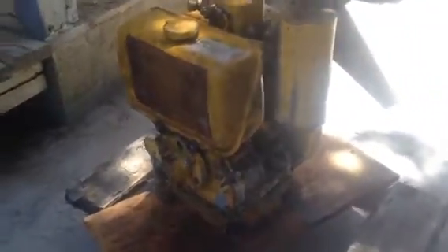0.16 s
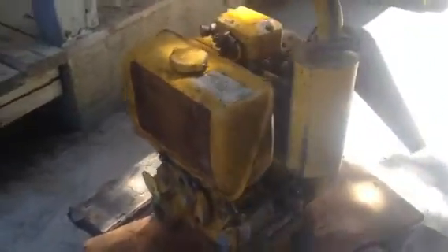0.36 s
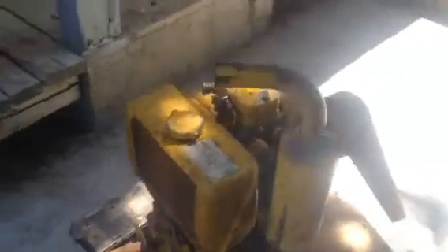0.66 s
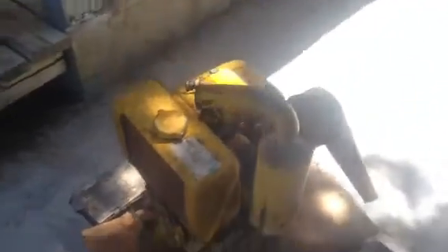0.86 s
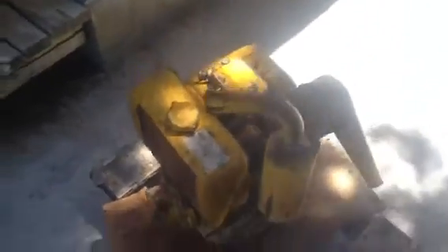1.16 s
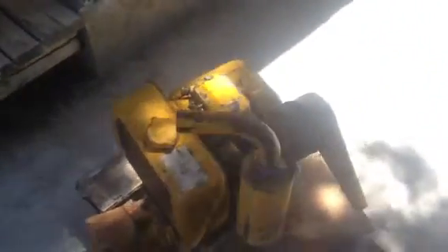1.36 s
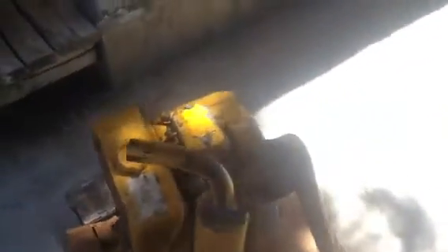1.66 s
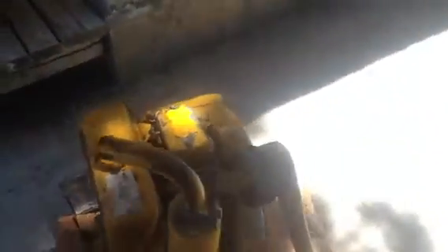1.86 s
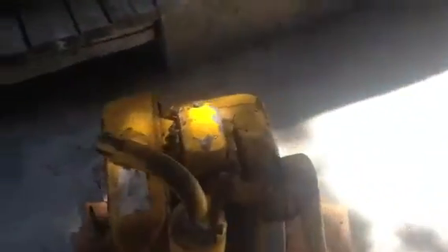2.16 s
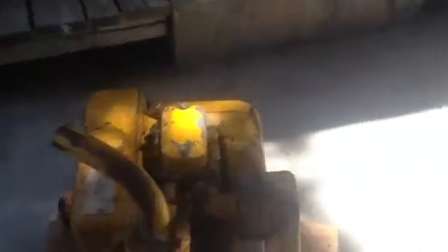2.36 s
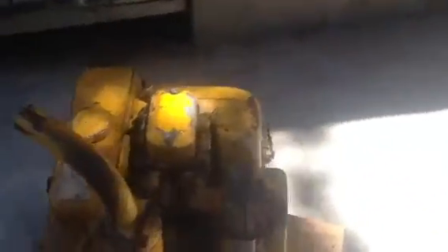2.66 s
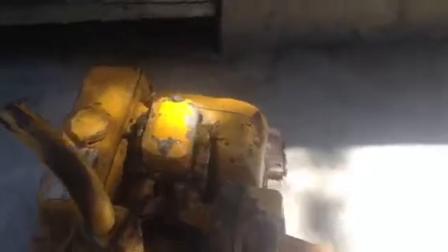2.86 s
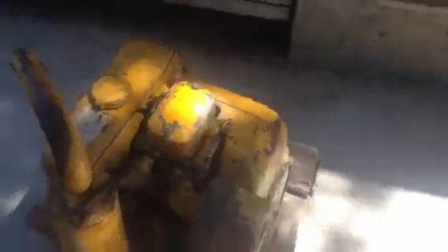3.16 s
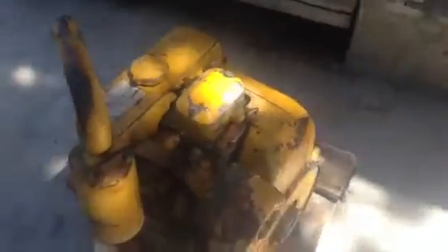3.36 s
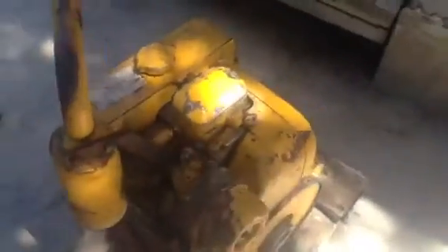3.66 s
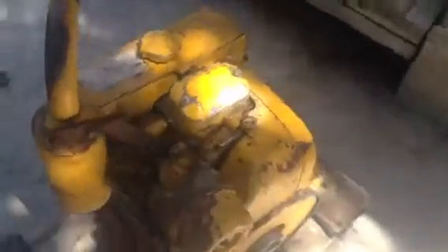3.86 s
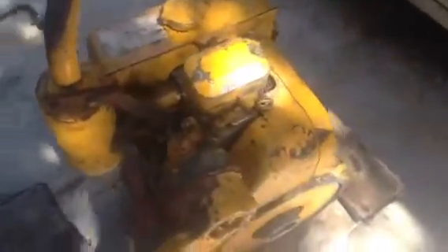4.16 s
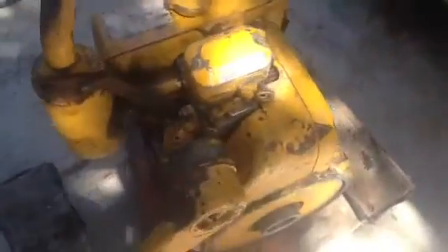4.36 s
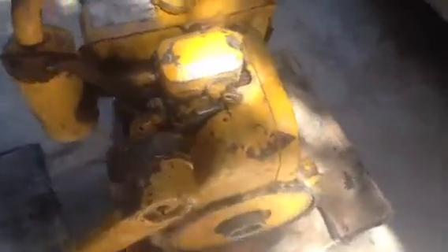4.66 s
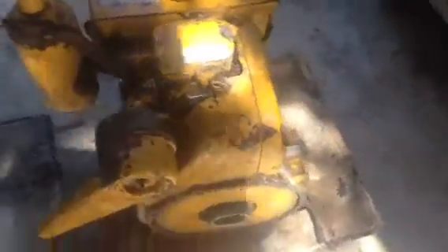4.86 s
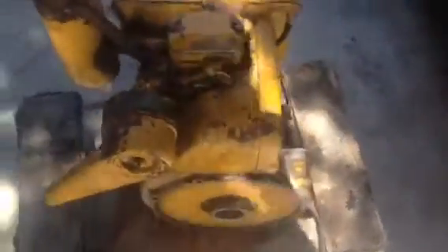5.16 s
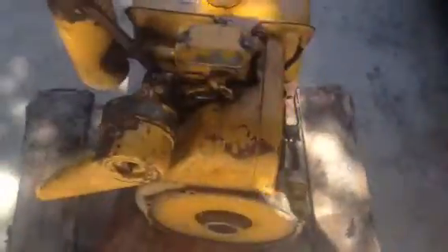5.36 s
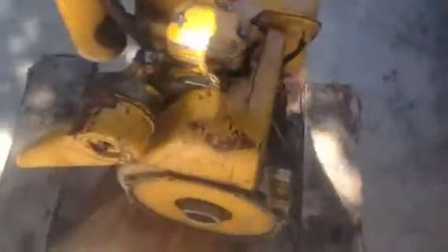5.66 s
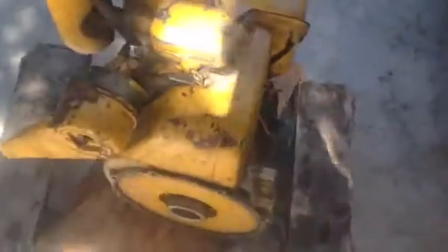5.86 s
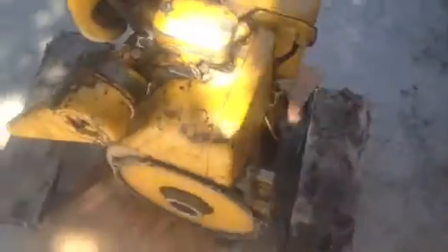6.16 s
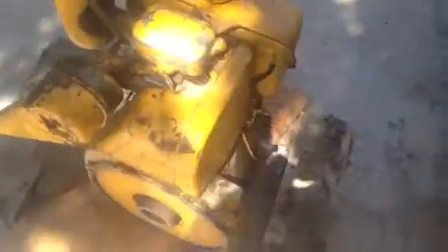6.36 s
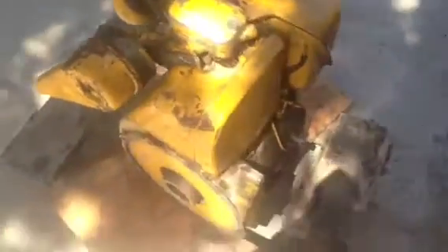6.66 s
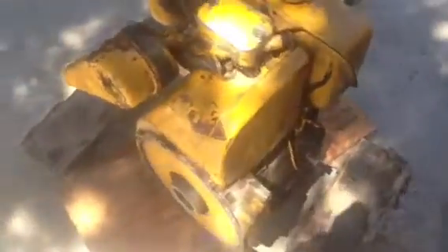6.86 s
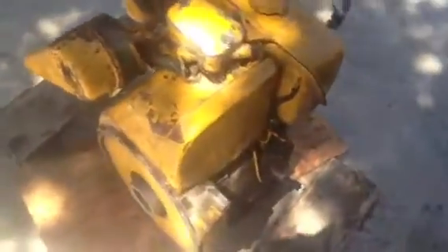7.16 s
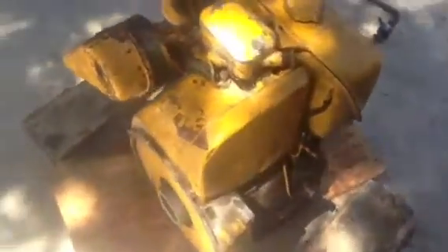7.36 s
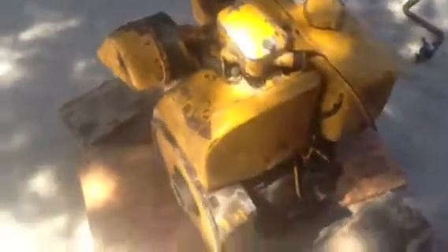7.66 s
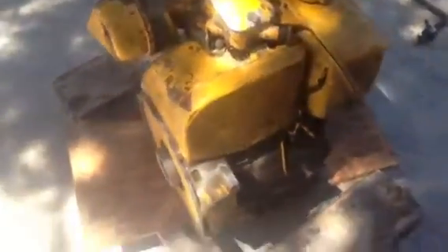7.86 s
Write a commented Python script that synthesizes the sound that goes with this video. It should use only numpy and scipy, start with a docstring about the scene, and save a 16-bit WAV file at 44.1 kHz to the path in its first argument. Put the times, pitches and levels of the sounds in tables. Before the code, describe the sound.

Steady clattering idle of a small diesel engine outdoors, dulled for a few seconds as a finger covers the microphone.

```python
"""In a yard, a small one-cylinder four-stroke diesel idles on boards, heard by a phone walking round it.
Each firing knocks the engine block and makes it ring. Fuel pump, piston, valves and exhaust add
thuds, clatter and puffs at set places in the cycle, over a whirring fan and a light breeze.
A finger slides over the microphone hole for some seconds, dulling the treble and creaking on the case.
Near the end the phone drops a tiny piece of the sound."""
import sys
import numpy as np
from scipy import signal
from scipy.fft import rfft, irfft
from scipy.io import wavfile
from scipy.ndimage import uniform_filter1d

SR = 44100
rng = np.random.default_rng(int(sys.argv[2]) if len(sys.argv) > 2 else 0)


def wrap_up_sound(samples):
    """Save the sound to the file named by the first command line argument, as 16-bit audio."""
    columns = np.atleast_2d(samples).T
    # keep every value between -1 and 1, then stretch to whole-number steps
    tamed = np.clip(columns, -1, 1)
    steps = np.round(tamed * 32767).astype(np.int16)
    wavfile.write(sys.argv[1], SR, steps)


N = 353241
SKIP_S, SKIP = 7.3795, 1024  # when the phone drops sound, and how many samples
FIRINGS, LEAD, CYCLE = 92, 700, 6144  # one row of sound a firing: samples before it, and in all
CYCLE_MS = (np.arange(CYCLE) - LEAD) * 1000 / SR  # time since the firing, like every t/ms below


def amp(db):
    return 10 ** (np.asarray(db) / 20)


def unit_rms(x):
    return x / np.sqrt(np.mean(x ** 2) + 1e-20)


def at_pitch(points, hz):
    f, value = np.transpose(points)
    return np.interp(np.log(hz + 1), np.log(f + 1), value)


def coloured(x, spectrum, tilt_db=0):
    """Filters x to a spectrum, tilted by tilt_db an octave around 4 kHz."""
    hz = np.abs(np.fft.fftfreq(4096, 1 / SR))
    log_gain = np.log(amp(at_pitch(spectrum, hz) + tilt_db * np.log2((hz + 100) / 4000)))
    phase = -signal.hilbert(log_gain).imag  # nothing rings before it is struck
    taps = np.fft.ifft(np.exp(log_gain + 1j * phase)).real[:2048]
    return signal.oaconvolve(x, taps)[:len(x)]


# The governor lets the idle drift a little: t/s, crank speed/rpm
IDLE_SPEED = [(0, 1346.04), (2.7, 1345.5), (5.4, 1351.24), (8.1, 1347.79)]
def firing_times(first_s=.0511):
    """The engine fires once in two turns, and is already running at the start."""
    clock = np.arange(-.1, N / SR + .2, 1 / SR)
    cycles = np.cumsum(np.interp(clock, *np.transpose(IDLE_SPEED))) / 120 / SR
    return np.interp(np.interp(first_s, clock, cycles) + np.arange(-1, FIRINGS - 1), cycles, clock)


FIRED_S = firing_times()
def at_firings(rows):
    """Places one row of sound at each firing."""
    track = np.zeros(N + SKIP + 3 * CYCLE)
    for start, row in zip(np.round(FIRED_S * SR).astype(int) - LEAD + CYCLE, rows):
        track[start:start + CYCLE] += row
    return track[CYCLE:CYCLE + N + SKIP]


# The walk round the engine: t/s, tank side in view/0-1, thuds/dB, puffs/dB, low rings/dB, silencer/dB
WALK_ROUND = [(0, 0.74, -26, -32, -33, -46), (.3, 0.57, -25, -26, -33.5, -38),
              (.55, 0.37, -21, -23, -26, -16.5), (1.2, 0.84, -20, -25, -25, -10),
              (1.9, 0.2, -17.5, -21.5, -29, -23), (2.5, 0.8, -19, -23.5, -22, -17),
              (2.85, 0.06, -23, -24, -27.5, -41), (3.3, 0, -18.5, -24.5, -26, -26),
              (3.9, 0.1, -22, -23, -28, -32), (4.701, 0.44, -20, -23.5, -27, -44),
              (5.5, .4, -23, -24, -25, -44), (6.5, 0.17, -21.5, -24, -31, -35),
              (7.001, 0, -19.5, -24.5, -40, -30), (7.4, 0.16, -23, -27.5, -51, -17),
              (8.01, 0, -21, -27, -35, -24)]
TANK, THUD, PUFF, LOW_RINGS, SILENCER = 1, 2, 3, 4, 5
def along_walk(column, table=WALK_ROUND, s=None):
    """Glides through one column of a timed table, allowing for the dropped samples."""
    columns = np.transpose(table)
    engine_s = columns[0] + (columns[0] > SKIP_S) * SKIP / SR
    return np.interp(np.arange(N + SKIP) / SR if s is None else s, engine_s, columns[column])


# How alike the noise is from one cycle to the next: f/Hz, likeness/0-1
LIKENESS = [(500, .9), (1500, .85), (3000, .55), (8000, .3)]
def rattle():
    """Noise for each cycle that partly repeats the one before, most in the bass."""
    same = at_pitch(LIKENESS, np.fft.rfftfreq(CYCLE, 1 / SR))
    spectra = rfft(rng.standard_normal((FIRINGS, CYCLE)))
    for k in range(1, FIRINGS):
        spectra[k] = same * spectra[k - 1] + np.sqrt(1 - same ** 2) * spectra[k]
    return irfft(spectra, CYCLE)


# Tone of the fan and gears: f/Hz, level/dB
FAN_TONE = [(60, -55), (200, -18.5), (330, -3), (500, -7), (1000, 0.5), (1650, -9.5), (2100, -19.5),
            (4200, -10.5), (5200, -17.5), (8000, -27), (9800, -29.5), (15000, -47)]
def fan_and_gears(db=-26.5):
    """The cooling fan and gears churn much alike each cycle, swelling after the firing."""
    crossfade = np.sqrt(np.clip(np.minimum(CYCLE_MS + 15, 89 - CYCLE_MS) / 15, 0, 1))
    swell = 0.39 + 1.29 * np.exp(-np.maximum(CYCLE_MS, 0) / 40) * (CYCLE_MS > 0)
    return amp(db) * unit_rms(coloured(at_firings(crossfade * swell * rattle()), FAN_TONE))


# Tone of the breeze: f/Hz, level/dB
BREEZE_TONE = [(30, -18), (60, -8), (90, -2), (200, -2), (500, -9.5), (2000, -42)]
def breeze(db=-41):
    """Air rumbles over the microphone."""
    return amp(db) * unit_rms(coloured(rng.standard_normal(N + SKIP), BREEZE_TONE))


# The finger shifts and lets one firing through: t/s, share uncovered/0-1, extra knock/dB
FINGER_LIFTS = [(3.175, 0.12, 7.5), (3.532, 0.24, 4), (6.73, 0.11, 9)]
def finger_lifts(column, s, width_s=0.043):
    """Each lift comes and goes in a short, smooth bump."""
    return sum(row[column] * np.exp(-.5 * ((s - row[0]) / width_s) ** 2) for row in FINGER_LIFTS)


# The knock as the phone moves nearer and further: t/s, level/dB
KNOCK_LEVEL = [(0, -9.5), (.68, -14.5), (1.4, -14), (1.9, -12.5), (2.5, -14.5), (3.0, -18), (3.35, -13),
               (3.9, -13.5), (5.04, -14), (5.8, -16.5), (6.5, -14.5), (6.9, -12), (7.7, -12), (8.01, -8)]
def knock_strength(scatter_db=1.0):
    """How loud each firing is; the fuel never burns twice alike."""
    db = along_walk(1, KNOCK_LEVEL, FIRED_S) + finger_lifts(2, FIRED_S)
    return amp(db[:, None] + scatter_db * rng.standard_normal((FIRINGS, 1)))


# Injector, flame crack, combustion knock, casing rattle, exhaust tappet, exhaust valve shutting,
# inlet valve shutting: rise/ms, fall/ms, level/dB, tilt/dB per octave
METAL_BLOWS = [(1.2, 4.5, -18, -4.5), (1.2, 3.35, -6, 4), (3.36, 3.7, 6.5, -0.5), (3.2, 19.4, -7.5, -2.5),
               (2.1, 3.8, -20, -5.5), (0.87, 9, -19.5, -6), (1.4, 2.4, -18.5, 1)]
BLOW_TIMES = [-9, -1, -.3, 2, 23, 46.5, 71]  # when each lands: t/ms
CLATTER_TONE = [(150, -35.5), (400, -9), (1000, -2.5), (2050, -4.5), (3040, 1.5), (4400, -2), (5300, -4.5),
                (7300, -2), (8300, -6), (9800, -20), (14600, -22), (16000, -35)]  # tone they share: f/Hz, level/dB
def metal_blows(knock):
    """Each blow is a burst of rattle. Returns the raw bursts and the clatter they make."""
    noise, bursts, clatter = rattle(), 0, 0
    for ms, (rise, fall, db, tilt_db) in zip(BLOW_TIMES, METAL_BLOWS):
        louder, later = rng.standard_normal((FIRINGS, 2, 1)).transpose(1, 0, 2)
        t = np.maximum(CYCLE_MS - ms - .3 * later, 0)
        scatter_db = 4.1 * louder * (abs(ms) > 5)  # the small blows, away from the firing, vary more
        envelope = (1 - np.exp(-(t / rise) ** 2)) * np.exp(-t / fall)
        burst = at_firings(knock * amp(db + scatter_db) * envelope * noise)
        bursts += burst
        clatter += coloured(burst, CLATTER_TONE, tilt_db)
    return bursts, clatter


def short_ring(ms, hz, rise, fall, db):
    """A tone that swells to a peak at ms and dies away, a little different each cycle."""
    louder, later = rng.standard_normal((FIRINGS, 2, 1)).transpose(1, 0, 2)
    t = CYCLE_MS - ms - .08 * later
    envelope = np.where(t < 0, np.exp(-.5 * (t / rise) ** 2), 1 / np.cosh(np.minimum(t / fall, 50)))
    return amp(db + 1.2 * louder) * envelope * np.cos(2 * np.pi * hz * t / 1000)


# Fuel pump, firing loads the crank, frame rebounds, silencer shakes, piston tips over,
# inlet valve shuts: f/Hz, rise/ms, fall/ms, relative level/dB
FRAME_THUDS = [(390, 2.6, 1.7, -5), (325, 2.6, 2.8, 2), (340, 2.5, 2.5, -12), (300, 3, 3, -12),
               (350, 2.6, 2.4, -4), (320, 2.6, 2, -10)]
THUD_TIMES = [-3.1, 9, 20, 30, 42.9, 75]  # when each peaks: t/ms
def frame_thuds():
    """Moving parts shake the frame with low thuds."""
    thuds = sum(short_ring(ms, *row) for ms, row in zip(THUD_TIMES, FRAME_THUDS))
    return at_firings(amp(along_walk(THUD, s=FIRED_S)[:, None] + 5) * thuds)


# Sharp jolts to the block: t/ms, level/dB
JOLTS = [(1.5, -0.5), (7.5, 2.5), (50, -14.5)]
# Natural notes of block, tank and cowl: f/Hz, width/Hz (wider dies sooner), level/dB
METAL_NOTES = [(665.3, 18, -1.5), (827.5, 26, -1.5), (1016.3, 51, 2), (1292, 14, 0.5), (1647, 25, 7.5),
               (1882, 23, 10.5), (2403, 36, 9.5), (2480, 20, -1.5), (2900, 29, -21.5), (3050, 59, 12),
               (3440, 37, -31.5), (3690, 43, -1), (4240, 43, 4), (4500, 42, -18), (5500, 51, 2),
               (6100, 67, 6.5), (6910, 57, -27.5)]
def ringing_block(knock, bursts, high_db=-33.5):
    """Jolts and rattle set the metal ringing; the low notes come and go along the walk."""
    jolts = sum(amp(db + 1.5 * rng.standard_normal((FIRINGS, 1)))
                * np.exp(-.5 * ((CYCLE_MS - ms) / .04) ** 2) for ms, db in JOLTS)
    shaking = unit_rms(at_firings(knock * jolts)) + amp(7) * unit_rms(bursts)
    t, rings = np.arange(6000) / SR, np.zeros((2, 6000))
    for hz, width, db in METAL_NOTES:
        decay = np.exp(-np.pi * max(width, hz / 60) * t)  # high notes never ring long
        rings[int(hz > 1450)] += amp(db) * np.sqrt(width) * decay * np.sin(2 * np.pi * hz * t)
    low, high = (unit_rms(signal.oaconvolve(shaking, ring)[:len(shaking)]) for ring in rings)
    return amp(along_walk(LOW_RINGS)) * low + amp(high_db) * high


# Three clanks of the cylinder and one of a valve: f/Hz, rise/ms, fall/ms, relative level/dB
IRON_CLANKS = [(1673, 1.84, 1.84, -5.5), (2620, 0.53, 1.4, -5.5), (3420, 0.88, 1, -9.5),
               (4290, 1.5, 1.9, -17)]
CLANK_TIMES = [7, 4.5, 4, 49]  # when each peaks: t/ms
def iron_clanks(knock, db=-4, tank_side_db=9):
    """Iron rings briefly, never twice alike, and loudest on the tank side."""
    scatter = rng.standard_normal((FIRINGS, len(IRON_CLANKS), 2, 1)).transpose(1, 2, 0, 3)
    iron = 0
    for ms, (hz, *shape), (louder, higher) in zip(CLANK_TIMES, IRON_CLANKS, scatter):
        iron += amp(3 * louder) * short_ring(ms, hz * (1 + .025 * higher), *shape)
    return amp(db + tank_side_db * along_walk(TANK)) * at_firings(knock * iron)


def silencer():
    """The silencer can gives a hollow ring just after each firing."""
    return amp(along_walk(SILENCER)) * at_firings(short_ring(ms=8.5, hz=975, rise=3.5, fall=4.5, db=0))


# Exhaust valve opens, air heaves, pipe answers, intake gulps: f/Hz, rise/ms, fall/ms, relative level/dB
PIPE_PUFFS = [(185, 3, 5, 0), (80, 8, 10, -13), (200, 5, 5, -8), (195, 4, 5, -9)]
PUFF_TIMES = [26.5, 34, 46.5, 72]  # when each peaks: t/ms
def pipe_puffs():
    """Gas leaves and enters the pipes in deep puffs."""
    puffs = sum(short_ring(ms, *row) for ms, row in zip(PUFF_TIMES, PIPE_PUFFS))
    return amp(along_walk(PUFF)) * at_firings(puffs)


# Change of tone with the hole covered, on the tank side and on the flywheel side: f/Hz, gain/dB
COVERED_TONE = [(100, 3), (320, 9), (800, 2), (1400, -9.5), (1850, -4.5), (2300, -15), (3300, -30.5),
                (4300, -32.5), (4900, -40), (8000, -36), (14000, -26)]
TANK_TONE = [(200, -1), (480, -1.5), (950, -7), (1300, -1), (1700, 2.5), (2700, 5.5), (4200, 2), (9000, -3)]
FLYWHEEL_TONE = [(300, -8), (950, -16), (1700, -3), (2800, 0.5), (4200, 13), (7000, 16.5), (9500, 1),
                 (15000, -0.5)]
FINGER_COVER = [(0, 0.25), (.45, 0.11), (1.1, 0.11), (1.85, 0.07), (2.5, 0.1), (2.64, 0.44), (2.82, 0.71),
                (3.08, 0.57), (3.3, 0.46), (3.62, 0.64), (4.3, 0.74), (5.04, 0.68), (5.8, 0.66),
                (6.64, 0.65), (6.73, 0.58), (6.82, 0.08), (7.26, 0.15), (8.01, 0.32)]  # the finger creeps on, stays, slides off: t/s, hole covered/0-1
FLYWHEEL_VIEW = [(0, 0.39), (6.3, 0.28), (6.999, 0.5), (8.01, 0.8)]  # flywheel side in view: t/s, share/0-1
def finger_and_sides(x, top_treble_db=2):
    """The finger muffles the microphone, and each side of the engine has its own tone."""
    hz, t, spectra = signal.stft(x, SR, nperseg=512, noverlap=384)
    tones = [(COVERED_TONE, along_walk(1, FINGER_COVER, t) - finger_lifts(1, t)),
             (TANK_TONE, along_walk(TANK, s=t)),
             (FLYWHEEL_TONE, along_walk(1, FLYWHEEL_VIEW, t))]
    gain_db = sum(at_pitch(tone, hz)[:, None] * share for tone, share in tones)
    gain_db += np.clip((hz[:, None] - 8500) / 2000, 0, 1) * top_treble_db
    return signal.istft(spectra * amp(gain_db), SR, nperseg=512, noverlap=384)[1][:len(x)]


# Finger creaks: t/s, length/s, first slip rate/Hz, last slip rate/Hz, level/dB, roughness/0-1
SKIN_CREAKS = [(0.301, 0.075, 130, 91, -33, 0.65), (1.72, 0.078, 170, 290, -33, 0.44),
               (1.926, 0.068, 120, 150, -26, 0.05), (2.025, 0.091, 200, 76, -25.5, 0.57),
               (2.72, 0.034, 170, 130, -35, 0.5), (3.07, 0.037, 155, 190, -29, 0.7),
               (3.37, 0.15, 160, 240, -24.5, 0.51), (3.983, 0.039, 220, 290, -48, 0.56),
               (4.299, 0.042, 170, 220, -33, 0.45), (4.36, .04, 150, 170, -28.5, 0.4),
               (5.23, 0.1, 140, 160, -37, 0.7), (6.676, 0.048, 210, 300, -23, 0.53),
               (6.664, 0.15, 340, 285, -25.5, 0.93), (7.04, 0.027, 165, 240, -30, 0.7),
               (7.885, 0.033, 170, 170, -28.5, .5)]
CASE_TONE = [(60, -11), (150, 9.5), (300, -6.5), (480, -6.5), (650, -7.5), (1000, 0), (1800, -14.5),
             (4000, -47.5)]  # tone of the phone case: f/Hz, level/dB
def creak(length, start_hz, end_hz, db, rough):
    """Skin sticks and slips unevenly on the case; a rough rub is brighter."""
    size = round(length * SR)
    wobble = unit_rms(uniform_filter1d(rng.standard_normal(8000), 150))[:size]
    slip_hz = np.linspace(start_hz, end_hz, size) * (1 + .3 * rough * wobble)
    slips = np.diff(np.floor(np.cumsum(slip_hz) / SR), prepend=0)
    rub = unit_rms(uniform_filter1d(slips, 40)) + 3 * rough * rng.standard_normal(8000)[:size]
    return amp(db) * unit_rms(coloured(rub, CASE_TONE, 4.9 * rough)) * np.sqrt(np.hanning(size))


def scene():
    """Engine and breeze pass the finger; the creaks come straight through the case."""
    knock = knock_strength()
    bursts, clatter = metal_blows(knock)
    air = breeze()
    metal = amp(7.5) * clatter + ringing_block(knock, bursts) + iron_clanks(knock) + silencer()
    heard = finger_and_sides(air + metal + frame_thuds() + pipe_puffs() + fan_and_gears())
    heard = np.delete(heard, round(SKIP_S * SR) + np.arange(SKIP))
    for s, *row in SKIN_CREAKS:
        sound = creak(*row)
        heard[round(s * SR):][:len(sound)] += sound
    return heard[None]


def record(dry, low_cut_hz=108, high_cut_hz=15650):
    """The phone adds faint hiss, thins the bass, softly squashes the knocks and cuts the very top."""
    hissy = dry + amp(-84) * rng.standard_normal(dry.shape)
    thin = signal.sosfilt(signal.butter(2, low_cut_hz, "high", fs=SR, output="sos"), hissy)
    squashed = .9 * np.tanh(thin / .9)
    high_cut = signal.firwin(201, high_cut_hz, window=("kaiser", 9), fs=SR)
    return signal.oaconvolve(squashed, high_cut[None], "same")


dry = scene()
out = record(dry)
wrap_up_sound(out)
```